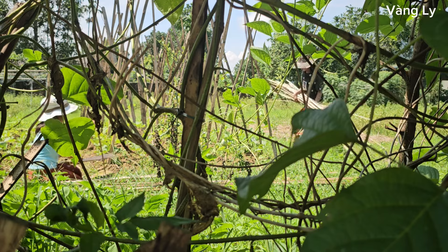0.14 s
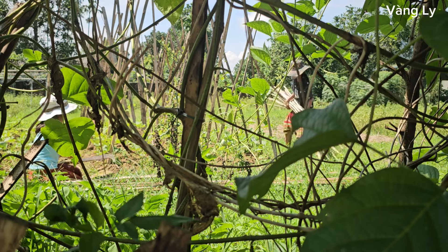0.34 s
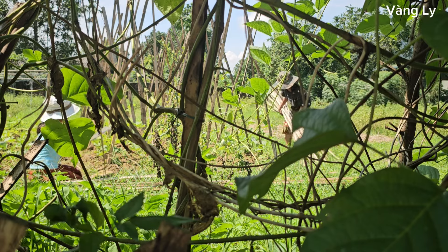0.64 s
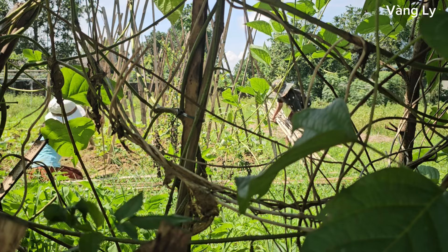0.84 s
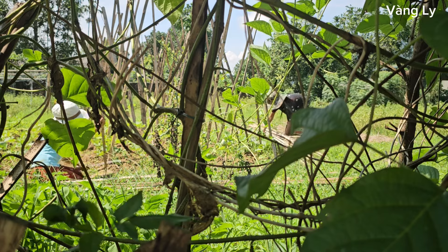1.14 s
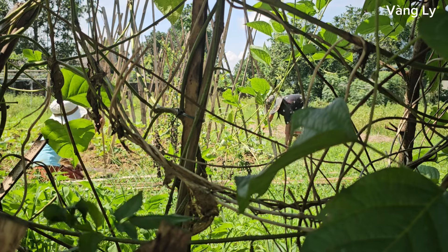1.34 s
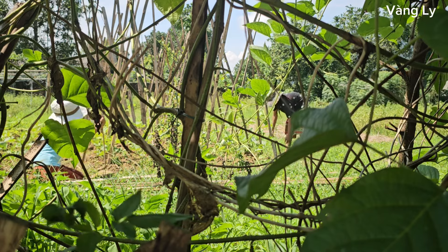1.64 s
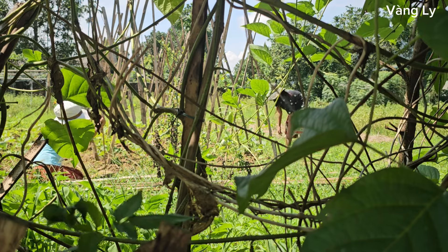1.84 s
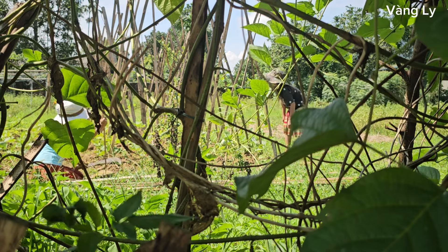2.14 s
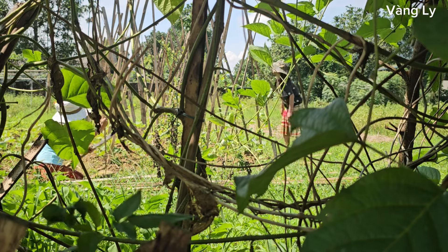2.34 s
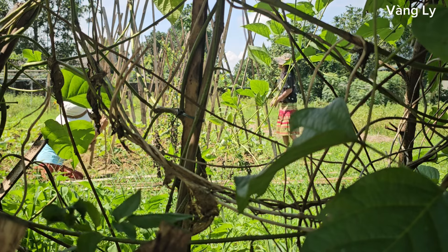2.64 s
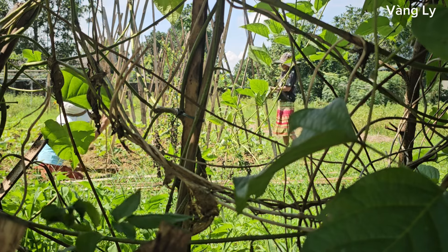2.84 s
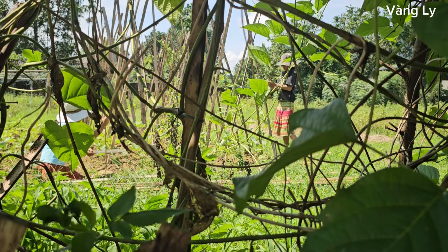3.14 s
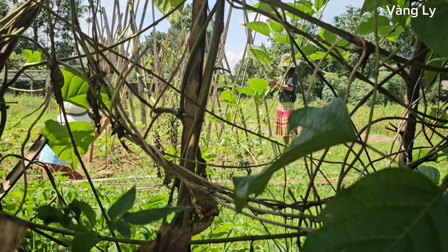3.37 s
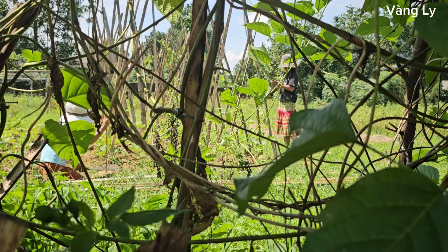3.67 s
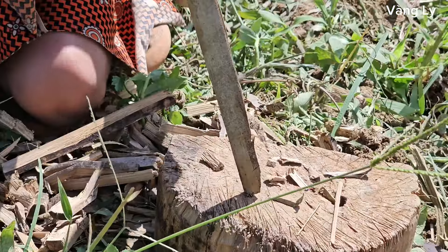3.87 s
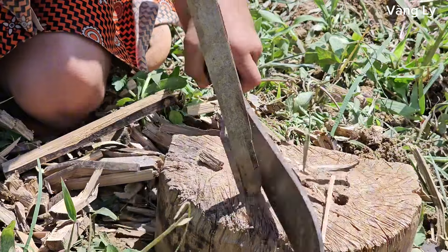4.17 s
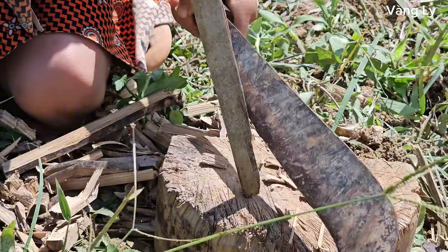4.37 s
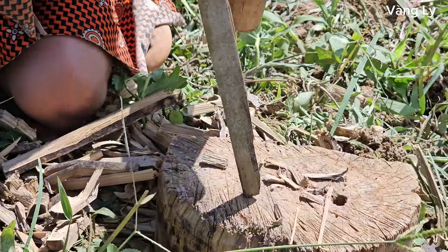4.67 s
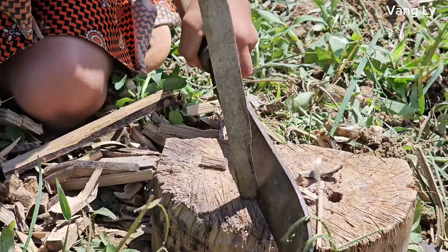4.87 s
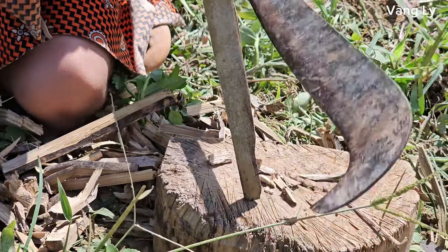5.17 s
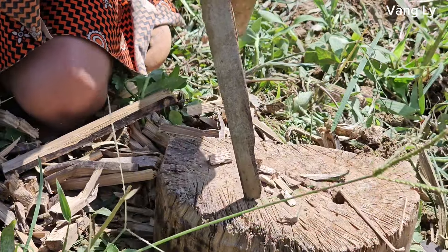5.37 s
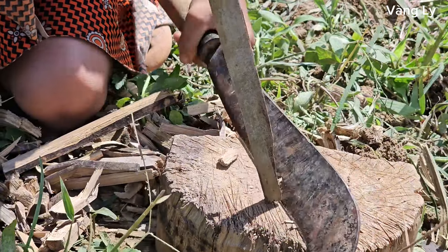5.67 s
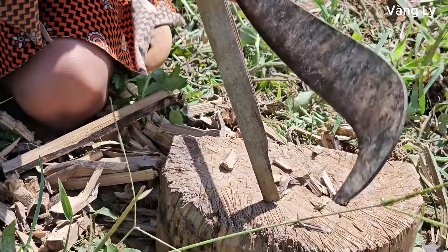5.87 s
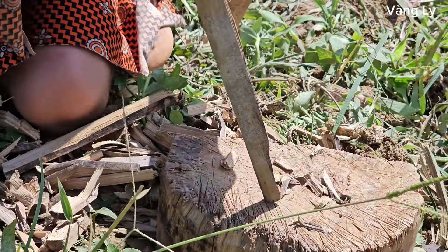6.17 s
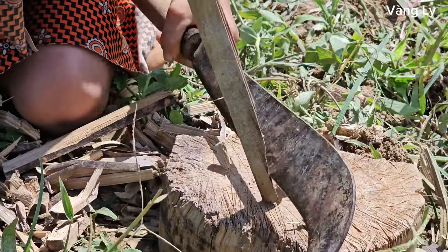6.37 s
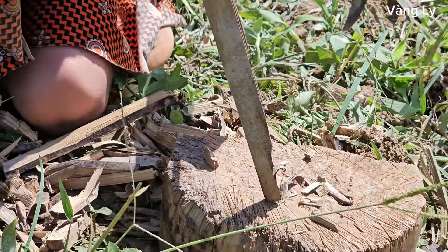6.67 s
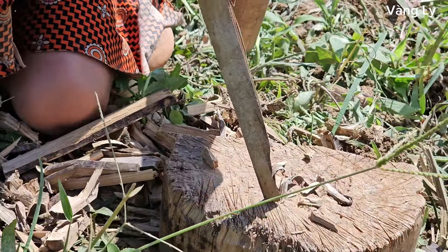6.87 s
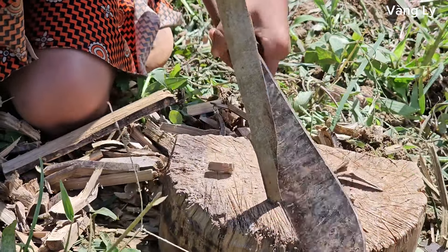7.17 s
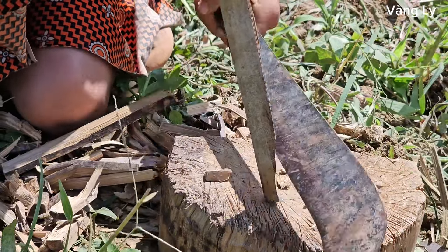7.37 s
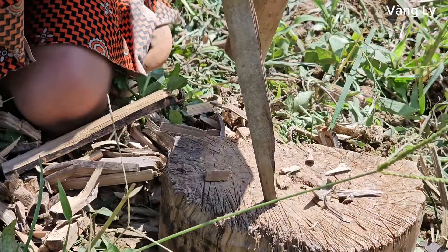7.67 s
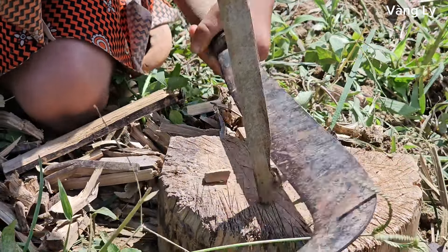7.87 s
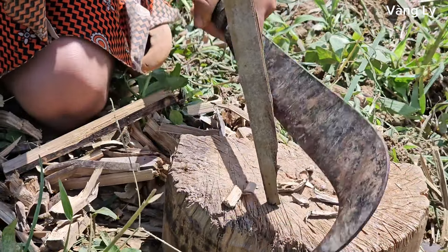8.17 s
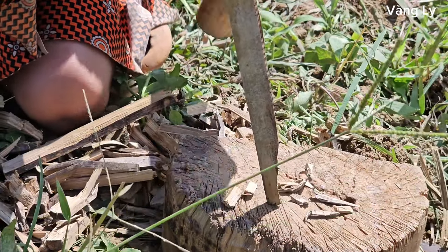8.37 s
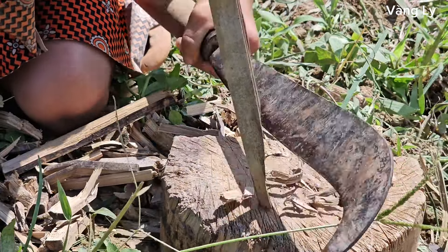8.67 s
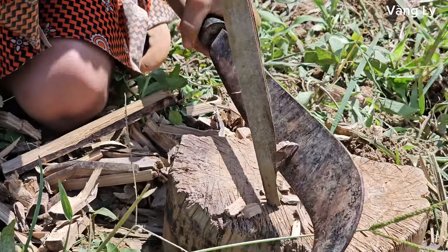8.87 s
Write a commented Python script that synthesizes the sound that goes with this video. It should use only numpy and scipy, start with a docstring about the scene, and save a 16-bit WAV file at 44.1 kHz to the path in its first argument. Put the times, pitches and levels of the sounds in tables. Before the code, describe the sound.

A sunny open garden with low breathing wind, a thin steady insect buzz around 4 to 8 kHz and light stereo width. From 0 to 3.7 seconds all is at a distance: a bird gives quick upward-leaping chirps, others whistle faintly, and leaves brush softly until about 2. Soft chops with outdoor echo fall at 1.1, 1.9, 2.7 and 3.5. At about 1.2 to 1.6 a bundle of bamboo poles lands, a dense hollow clatter with a short roll and a last clack. A very brief dip at 3.7 cuts to a close, drier perspective with slightly gusty rumble. Loud machete strokes crack a stake at 4.1, 4.9, 5.6, 6.3, 7.0, 7.8 and 8.6: sharp fibre snaps, short woody ringing, most followed by a double-hit knock on the stump, dull ground thumps, and splinters ticking down, fading between strokes.

```python
"""Stake sharpening in a garden

Moving air, an insect chorus and bird calls are shaped noise and gliding tones. A bundle of bamboo poles
lands and rolls: enveloped noise with struck modes. A machete sharpens a stake, first from afar, then close by:
bursts of snapping fibres excite resonances, the blade knocks on the stump, the stump thumps on the soil,
and chips patter down. Echo tails carry the surroundings; a brief dip in level parts the far and close views."""
import sys
import numpy as np
from scipy import signal
from scipy.fft import rfft, irfft, next_fast_len
from scipy.io import wavfile
from scipy.ndimage import uniform_filter1d

SR = 44100
rng = np.random.default_rng(int(sys.argv[2]) if len(sys.argv) > 2 else 0)


def to_wav(sig):
    """Store sig (one row per channel, or 1-D mono) as 16-bit WAV at the path in sys.argv[1].

    Samples outside -1..1 are clipped; the rate is SR.
    """
    pcm = np.clip(np.atleast_2d(sig), -1, 1) * 32767
    pcm = np.round(pcm).astype(np.int16)
    wavfile.write(sys.argv[1], SR, pcm.T)  # frames by channels


N = 397341
TIME = np.arange(N) / SR

# All levels are relative: mixing gains follow.
# dip between the far and the close view: start_s, end_s
GAP = (3.712, 3.745)
# spectrum of the air from afar, and close by: frequency_hz, density_db
AIR_FAR = [(20, -10.5), (50, 4), (110, -6), (200, -17.5), (400, -29), (900, -36.5), (2500, -39),
           (9000, -53), (16000, -40.5)]
AIR_CLOSE = [(20, -13), (48, 2.5), (110, -12), (220, -23), (380, -37.5), (650, -34.5), (1200, -44),
             (3000, -47), (9000, -54.5), (16000, -52)]
AIR_FAR_DB, AIR_CLOSE_DB = -52.5, -48
# swells of the breeze, close view: peak_s, half_width_s (to 1/e of the gain in dB), gain_db
GUSTS = [(3.904, 0.46, 3), (5.898, 1.2, 3), (8.617, 0.2, 4)]
# insect chorus: centre_hz, width_hz, far_level_db, close_level_db
INSECTS = [(4200, 300, -70, -71.5), (4800, 160, -71, -66), (5290, 200, -69, -66.5), (7570, 240, -71, -69.5)]
# likeness of left and right in diffuse sound: frequency_hz, correlation (0 to 1)
LIKENESS = [(60, 0.94), (130, .92), (290, 0.29), (640, 0.12), (1410, 0.2), (16000, 0.29)]
# reverberation of the garden: frequency_hz, t60_s
GARDEN_DECAY = [(100, 0.42), (600, 0.52), (2000, 0.41), (5000, 0.53), (15000, 0.1)]

# chirps of one bird: leap_s, level_db
CHIRPS = [(0.451, -46), (.598, -46), (0.856, -47), (1.827, -48), (2.106, -49), (2.31, -48), (2.498, -48.5),
          (3.441, -44.5), (3.679, -47)]
# faint glides of other birds: start_s, length_s, start_hz, end_hz, level_db
WHISTLES = [(0.146, 0.091, 6280, 4700, -54.5), (0.326, 0.13, 4760, 4730, -53.5),
            (0.385, 0.11, 7000, 7730, -54), (0.534, 0.031, 2740, 1950, -53),
            (3.089, 0.087, 4180, 4480, -57.5), (3.226, 0.14, 4610, 3470, -58.5)]
# a chirp is a low arch with a quick leap on top; each chirp varies its pitch and the leap a little
CHIRP_LEAD_S, CHIRP_TAIL_S = 0.033, 0.026  # before and after the leap
CHIRP_END_HZ, CHIRP_ARCH_HZ, CHIRP_LEAP_HZ = 1898, 2630, 4290
LEAP_RISE_S, LEAP_FALL_S, ARCH_DB, LEAP_DB = 0.0066, .01, -2, 4
CHIRP_QUAVER, WHISTLE_QUAVER = 0.043, 0.0197  # rms unsteadiness as a share of the pitch

# leaves brushing the poles: start_s, end_s, level_db
LEAVES = [(-.2, 2.03, -70.5), (.33, 0.69, -62), (.75, 1.7, -66)]
LEAF_RISE_S, LEAF_FALL_DB_PER_S = 0.055, 46
# spectrum of the leaves: frequency_hz, level_db
LEAF = [(300, 7.5), (1000, 3.5), (2200, 8.5), (5000, 5), (9000, -3), (12000, 2.5), (16000, -19)]
# the bundle meets the ground, tips first, then its full weight, then a bounce:
# start_s, level_db, rise_s, fall_db_per_s
LANDINGS = [(1.289, -41, 0.0043, 250), (1.312, -30.5, 0.027, 267), (1.374, -39.5, 0.0087, 121)]
LANDING_DULL_DB = -5.5  # hollow body of the poles against their bright clatter
ROLL_FROM_S, ROLL_TO_S, ROLL_DB, ROLL_RISE_S, ROLL_FALL_DB_PER_S = 1.16, 1.6, -55.5, .03, 157
# spectra of the bright clatter and the dull body: frequency_hz, level_db
POLES_BRIGHT = [(80, -1), (300, -6.5), (700, -25), (1400, 0), (3200, 1.5), (6000, -8.5), (10000, -36),
                (16000, -27)]
POLES_DULL = [(80, -1), (400, -9.5), (900, 7.5), (1600, 0), (4000, -1), (16000, -12.5)]
# single poles knocking clear of the clatter: start_s, pitch_hz, level_db
CLACKS = [(1.187, 690, -45), (1.585, 860, -41.5)]

# strokes: start_s, cut_length_s, tearing_db, tilt_db_per_octave, stake_ring_db, stump_thump_db
STROKES = [(1.075, 0.017, -33.5, -2.5, -52, -35.5), (1.924, 0.016, -34, -0.5, -53, -29.5),
           (2.684, 0.042, -37.5, -3.5, -56, -39), (3.511, 0.02, -37, -1, -64, -34),
           (4.1258, 0.02, -17.5, -1, -26.5, -25), (4.851, 0.011, -18.5, 1.5, -31.5, -22),
           (5.569, 0.0087, -14, -0.5, -22, -16.5), (6.2943, 0.008, -12.5, -1, -25.5, -11),
           (7.001, 0.01, -14.5, -0.1, -24.5, -22), (7.849, 0.0098, -12, -1, -24, -12.5),
           (8.6346, 0.0086, -13, -1, -17.5, -14)]
# blade on stump, with one rebound: start_s, strength_db, tilt_db_per_octave, rebound_delay_s, rebound_db
KNOCKS = [(2.7111, 16.5, -8, 0.0057, 1), (4.1502, 32, -2, 0.0044, 4), (4.866, 30.5, -1.5, 0.0038, 16),
          (5.6181, 15, -4.5, 0.016, 14.5), (7.0145, 29.5, -2, 0.0039, 18), (7.935, 1.5, -18, 0.00524, -14),
          (7.9514, 10.5, -1.5, 0.0053, 10), (8.7224, 1, 4.5, 0.0068, -2.5)]
# larger splinters snapping off or landing: start_s, level_db, tilt_db_per_octave
CHIPS = [(3.523, -32.5, 3.5), (3.753, -31, -1), (3.773, -40.5, -1), (4.025, -48.5, -2),
         (4.199, -35.5, -4.5), (4.276, -42.5, -3.5), (4.301, -40, 2), (4.372, -41, 1), (4.45, -47, -4),
         (5.6257, -22, -10), (5.642, -33.5, -5), (5.8, -42.5, -4.5), (5.883, -48, -2), (6.333, -29.5, -7.5),
         (6.369, -29.5, -2.5), (6.38, -38, -4), (6.439, -41, 2), (6.534, -44.5, -2), (6.745, -50, -6.5),
         (7.072, -34, 0), (7.131, -41, -3.5), (7.283, -39, -2), (7.9228, -23, 0.5), (7.934, -29, -2.5),
         (8.067, -33.5, 1), (8.1312, -41, 1.5), (8.179, -49.5, -1), (8.678, -26.5, -5),
         (8.7177, -19.5, -2.5), (8.79, -25, 3), (8.908, -35.5, -2.5)]
# spectra of torn fibres, of a chip, and of a knock on the stump: frequency_hz, level_db
TEAR = [(100, -3), (400, -9.5), (900, -2), (2000, -2), (4500, 1.5), (8000, 1), (12000, 0.5), (16000, -6.5)]
CHIP = [(200, -22), (1000, -23), (2500, -10), (3700, 1), (7000, 4.5), (11000, 4), (16000, -5)]
STUMP = [(50, -23), (150, -14), (250, -10.5), (350, -22), (410, -14), (500, -2.5), (620, -5.5), (770, 2),
         (950, -6.5), (1400, -8.5), (1750, -23), (2030, -3.5), (2500, -23.5), (4000, -20.5), (12000, -34)]
# spectrum of a knock as the surroundings return it: frequency_hz, level_db
ECHO_COLOUR = [(100, 3), (350, 8.5), (560, -2), (770, -5), (1100, -5.5), (1500, 0), (2030, -1), (3000, 3),
               (8000, 1.5)]
# modes of the stake: pitch_hz, level_db
STAKE = [(1130, -7.5), (1210, -7), (1310, 0), (1710, -4.5), (1850, 2), (2350, -11.5), (2880, -6), (3100, 3),
         (3570, -1), (3930, 1.5), (4200, 2), (4800, -3), (5380, -6.5)]
STAKE_T60_S = .03  # shared by all its modes
# modes of blade and stump after a knock: pitch_hz, level_db, t60_s
BLADE = [(555, -67, .13), (1280, -75, .14), (2020, -69, .14), (2340, -79, .1), (3730, -77, .12)]
# range of the modes of a chip: lowest_hz, highest_hz
CHIP_RANGE = (3200, 7500)
CHIP_S = .0055  # length of its crackle
# small chips after each stroke: first and last landing, level against the tearing, fall with delay
SHOWER_FROM_S, SHOWER_TO_S, SHOWER_DB, SHOWER_FALL_DB_PER_S = 0.036, .3, -22, 64.5


def amp(db):
    """Level law: decibels to amplitude gain."""
    return 10 ** (np.asarray(db) / 20)


def unit(x):
    """Normalisation: scales a signal to rms 1."""
    return x / np.sqrt(np.mean(x ** 2) + 1e-20)


def read(points, hz):
    """Interpolation: joins a table's points along a log-frequency axis."""
    f, value = np.transpose(points)
    return np.interp(np.log(hz + 1), np.log(f + 1), value)


def add(mix, s, sound):
    """Superposition: adds a sound to the mix at time s."""
    part = mix[round(s * SR):][:len(sound)]
    part += sound[:len(part)]


def swell(start, end, rise_s, fall_db_per_s):
    """Envelope: linear rise from the start, hold until the end, exponential decay."""
    rise = np.clip((TIME - start) / rise_s, 0, 1)
    return rise * amp(-fall_db_per_s * np.clip(TIME - end, 0, 2))


def wander(below_hz):
    """Low-pass noise: a slow random fluctuation of rms 1."""
    size = next_fast_len(N)
    spectrum = rfft(rng.standard_normal(size))
    return unit(irfft(spectrum * (np.fft.rfftfreq(size, 1 / SR) < below_hz), size)[:N])


def correlate(a, b, likeness):
    """Interaural coherence: a stereo pair from independent spectra a and b."""
    return np.array([a, likeness * a + np.sqrt(1 - likeness ** 2) * b])


def diffuse(colour, grain_db=0):
    """Diffuse field: stereo noise, most alike in the bass; grain makes its level uneven."""
    size = next_fast_len(N)
    hz = np.fft.rfftfreq(size, 1 / SR)
    clumps = amp(grain_db * np.repeat(rng.standard_normal(size), 48)[:size])
    a, b = rfft(rng.standard_normal((2, size)) * clumps)
    stereo = correlate(a, b, read(LIKENESS, hz))
    return unit(irfft(stereo * amp(read(colour, hz)), size)[:, :N])


def click(colour, tilt_db=0, pivot_hz=700, size=4096):
    """Minimum phase: the most compact causal impulse with a given spectrum."""
    hz = np.fft.rfftfreq(size, 1 / SR)
    level_db = read(colour, hz) + tilt_db * np.log2(np.maximum(hz / pivot_hz, .5))
    log_gain = np.log(amp(level_db))
    both_sides = np.r_[log_gain, log_gain[-2:0:-1]]
    # the phase is the Hilbert transform of the log gain
    return np.fft.ifft(np.exp(np.conj(signal.hilbert(both_sides)))).real


def ring(modes, detune=0):
    """Modal synthesis: a sum of decaying sines, each randomly detuned by up to a given share."""
    longest_s = max(t60 for _, _, t60 in modes)
    t = np.arange(round(1.2 * SR * longest_s) + 64) / SR
    sound = 0
    for hz, db, t60 in modes:
        shifted_hz = hz * (1 + detune * rng.uniform(-1, 1))
        sound = sound + amp(db - 60 * t / t60) * np.sin(2 * np.pi * shifted_hz * t)
    return sound


def crackle(length, grain_db=3.5, fade_s=.0025):
    """Fracture noise: fibres snap unevenly through the cut, then the force decays exponentially."""
    t = np.arange(SR // 12) / SR
    grain = np.repeat(rng.standard_normal(len(t)).clip(-2, 2), 12)[:len(t)]
    snaps = rng.standard_normal(len(t)) * amp(grain_db * grain)
    force = np.interp(t, [0, length / 2, length], [1, 1, .5])
    return snaps * force * np.exp(-np.maximum(t - length, 0) / fade_s)


def burst(drive, body, length):
    """Forced resonance: a drive excites a body; the energy is that of rms 1 over the length."""
    sound = signal.fftconvolve(drive, body)
    return sound * np.sqrt(length * SR / np.sum(sound ** 2))


def scatter(x, t60s, rise_s):
    """Scattering: ground, stems and trees return a clustered tail, its decay set for each frequency."""
    size = SR * 3 // 4
    clusters = amp(2.5 * unit(uniform_filter1d(rng.standard_normal(size), size=200)))
    hz, t, z = signal.stft(rng.standard_normal((2, size)) * clusters, SR, nperseg=256)
    z = correlate(z[0], z[1], read(LIKENESS, hz)[:, None])
    decay = np.exp(-np.log(1000) * t / read(t60s, hz)[:, None])
    tail = signal.istft(z * decay, SR, nperseg=256)[1]
    tail = tail * (1 - np.exp(-np.arange(tail.shape[1]) / SR / rise_s))
    return signal.fftconvolve(x[None], tail / np.linalg.norm(tail[0]), axes=1)[:, :N]


def from_left(x, lead_s, balance_db):
    """Interaural time and level difference: the left channel leads by lead_s."""
    lag = round(lead_s * SR)
    delayed = np.r_[np.zeros(lag), x][:N]
    return np.array([x * amp(balance_db / 2), delayed * amp(-balance_db / 2)])


def air():
    """Wind noise: a low rumble, its level fluctuating, with gusts in the close view."""
    gust_db = sum(db * np.exp(-((TIME - s) / half_s) ** 2) for s, half_s, db in GUSTS)
    far = amp(AIR_FAR_DB) * diffuse(AIR_FAR)
    close = amp(AIR_CLOSE_DB + gust_db) * diffuse(AIR_CLOSE)
    rumble = np.where(TIME < GAP[0], far, close) * amp(1.2 * wander(20))
    return signal.sosfilt(signal.butter(2, 30, "high", fs=SR, output="sos"), rumble)


def buzz(centre_hz, width_hz):
    """Incoherent sum: many insects blur into one noise band around their shared resonance."""
    size = next_fast_len(N)
    band = np.exp(-((np.fft.rfftfreq(size, 1 / SR) - centre_hz) / (2 * width_hz)) ** 2)
    return unit(irfft(rfft(rng.standard_normal((2, size))) * band, size)[:, :N])


def insects(pulses_per_s=8.7, pulse_at_s=2.41):
    """Amplitude modulation: a nearly steady chorus, and from afar one insect that pulses."""
    far = TIME < GAP[0]
    chorus = 0
    for hz, width_hz, far_db, close_db in INSECTS:
        chorus = chorus + buzz(hz, width_hz) * amp(np.where(far, far_db, close_db))
    pulses = (1 + .5 * np.cos(2 * np.pi * pulses_per_s * (TIME - pulse_at_s))) / 2 * far
    pulsing_db = np.interp(TIME, [1.5, 3], [-68, -64])
    return chorus * amp(.5 * wander(20)) + buzz(6080, 120) * pulses * amp(pulsing_db)


def quaver(hz, share):
    """Frequency jitter: a bird's pitch never holds quite still."""
    return hz * (1 + share * unit(uniform_filter1d(rng.standard_normal(len(hz)), size=60)))


def chirp(throat_hz=4000, throat_width_hz=1400):
    """Source and filter: a gliding tone and its octave through a broad throat resonance."""
    t = np.arange(-CHIRP_LEAD_S, CHIRP_TAIL_S, 1 / SR)
    stretch, pitch, height = 1 + rng.uniform(-1, 1, 3) * [.3, .05, .15]  # no two quite alike
    arch = np.sqrt(abs(np.sin(np.linspace(0, np.pi, len(t)))))
    leap = np.exp(-(t / stretch / np.where(t < 0, LEAP_RISE_S, LEAP_FALL_S)) ** 2)
    arch_hz = CHIRP_END_HZ + (CHIRP_ARCH_HZ - CHIRP_END_HZ) * arch
    leap_hz = (CHIRP_LEAP_HZ - CHIRP_ARCH_HZ) * leap * height
    hz = quaver(pitch * (arch_hz + leap_hz), CHIRP_QUAVER)
    phase = 2 * np.pi * np.cumsum(hz) / SR
    tone = 0
    for k in (1, 2):
        tone = tone + np.sin(k * phase) / (1 + ((k * hz - throat_hz) / throat_width_hz) ** 4)
    return arch * amp(ARCH_DB + LEAP_DB * leap) * tone


def whistle(length, start_hz, end_hz):
    """Frequency modulation: a single tone glides by equal ratios."""
    u = np.linspace(0, 1, round(length * SR))
    hz = quaver(start_hz * (end_hz / start_hz) ** u, WHISTLE_QUAVER)
    return np.sqrt(abs(np.sin(np.pi * u))) * np.sin(2 * np.pi * np.cumsum(hz) / SR)


def birds():
    """Reverberation: one bird chirps, others whistle, and the trees smear each call."""
    calls = np.zeros(N)
    for s, db in CHIRPS:
        add(calls, s - CHIRP_LEAD_S, amp(db) * chirp())
    for s, length, start_hz, end_hz, db in WHISTLES:
        add(calls, s, amp(db) * whistle(length, start_hz, end_hz))
    smeared = scatter(calls, [(2000, 0.27), (8000, 0.27)], rise_s=0.0065)
    return amp(-5.0) * calls + amp(-2.5) * smeared


def bundle_motion():
    """Energy addition: envelopes of the poles clashing as they land, and of their rolling."""
    power = sum((amp(db) * swell(s, s + rise_s, rise_s, fall)) ** 2 for s, db, rise_s, fall in LANDINGS)
    roll = amp(ROLL_DB) * swell(ROLL_FROM_S, ROLL_TO_S, ROLL_RISE_S, ROLL_FALL_DB_PER_S)
    return np.sqrt(power), roll


def leaves():
    """Friction noise: leaves brush the carried poles in overlapping swells."""
    power = 0
    for start, end, db in LEAVES:
        power = power + (amp(db) * swell(start, end, LEAF_RISE_S, LEAF_FALL_DB_PER_S)) ** 2
    return np.sqrt(power) * diffuse(LEAF, grain_db=2.5)


def bundle():
    """Many impacts merge into noise: bright and dull as the poles clash, dull as they roll to rest."""
    clash, roll = bundle_motion()
    dull = np.hypot(roll, amp(LANDING_DULL_DB) * clash)
    clatter = clash * diffuse(POLES_BRIGHT) + dull * diffuse(POLES_DULL, grain_db=1.0)
    return clatter * amp(1.7 * wander(80))


def pole_clacks(count=30, t60=0.016):
    """Bending modes: single hollow poles clack within the clatter, each at its own pitch."""
    out, force = np.zeros(N), np.hypot(*bundle_motion())
    clacks = [(s, hz, amp(db)) for s, hz, db in CLACKS]
    for when, pitch, luck in rng.random((count, 3)):
        s = ROLL_FROM_S + (ROLL_TO_S - ROLL_FROM_S) * when
        clacks.append((s, 520 + 700 * pitch, force[round(s * SR)] * amp(5 * luck)))
    for s, hz, gain in clacks:
        # overtones near those of a free bar
        add(out, s, gain * ring([(hz, 0, t60), (hz * 2.76, -2, t60 / 2), (hz * 5.4, -5, t60 / 2)]))
    return from_left(out, lead_s=.00018, balance_db=2) + amp(-4) * scatter(out, GARDEN_DECAY, rise_s=.005)


def debris(count=14, fall_db_per_s=95, level_db=-21, t60=0.013):
    """Small resonators: fragments rattle in the dry litter after each stroke, softer with delay."""
    out = np.zeros(N)
    for s, _, tear_db, *_ in STROKES:
        for when, pitch, force in rng.random((count, 3)):
            delay = .03 + .16 * when
            hz = 1200 * 3.5 ** pitch
            tick = ring([(hz, 0, t60), (hz * 1.9, -1, t60 / 2), (hz * 4.5, -2, t60 / 2)])
            add(out, s + delay, amp(tear_db + level_db - fall_db_per_s * delay + 3 * force) * tick)
    return out


def chip(db, tilt_db, ring_db=-6):
    """Fracture and resonance: a splinter crackles and rings with six pitches of its own."""
    snaps = crackle(CHIP_S, grain_db=4.5, fade_s=.0008)
    modes = [(hz, tilt_db * np.log2(hz), .022) for hz in rng.uniform(*CHIP_RANGE, size=6)]
    sound = np.zeros(SR // 8)
    add(sound, 0, burst(snaps, click(CHIP, tilt_db, size=1024), CHIP_S))
    add(sound, 0, amp(ring_db) * burst(snaps, ring(modes), CHIP_S))
    return amp(db) * sound


def chips(count=5, shower_tilt_db=-2, spread_db=3):
    """Random impacts: large splinters, then small chips after each stroke, softer with delay."""
    out = np.zeros(N)
    for s, db, tilt_db in CHIPS:
        add(out, s, chip(db, tilt_db))
    for s, _, tear_db, *_ in STROKES:
        for k, (when, force, colour) in enumerate(rng.random((count, 3))):
            delay = SHOWER_FROM_S * (SHOWER_TO_S / SHOWER_FROM_S) ** ((k + when) / count)
            db = tear_db + SHOWER_DB - SHOWER_FALL_DB_PER_S * delay + spread_db * (2 * force - 1)
            add(out, s + delay, chip(db, shower_tilt_db + 2 * (2 * colour - 1)))
    return out


def cuts(release_db=-2):
    """Forced and free vibration: tearing fibres ring the stake, which springs back mid-cut."""
    out = np.zeros(N)
    thin_stake = signal.butter(4, 900, "high", fs=SR, output="sos")  # radiates little bass
    for s, length, tear_db, tilt_db, stake_db, _ in STROKES:
        fibres = crackle(length, grain_db=4.2, fade_s=.0014)
        stake = ring([(hz, db, STAKE_T60_S) for hz, db in STAKE], detune=0.013)
        stake = signal.sosfilt(thin_stake, stake)
        add(out, s, amp(tear_db) * burst(fibres, click(TEAR, tilt_db, pivot_hz=2000), length))
        flex = fibres / np.linalg.norm(fibres)
        flex[round(length * SR / 2)] += amp(release_db)  # the shaving parts
        add(out, s, amp(stake_db) * burst(flex, stake, length))
    return out


def give(x, hz, radius):
    """All-pass dispersion: yielding wood delays the band around hz, so a knock builds up."""
    denominator = [1, -2 * radius * np.cos(2 * np.pi * hz / SR), radius * radius]
    return signal.lfilter(denominator[::-1], denominator, x)


def blade_knocks():
    """Impact and rebound: the blade strikes the stump twice, and both ring."""
    out = np.zeros(N)
    for s, first_db, tilt_db, rebound_s, rebound_db in KNOCKS:
        for at, db in (s, first_db), (s + rebound_s, rebound_db):
            add(out, at, -amp(db) * give(click(STUMP, tilt_db), hz=1000, radius=.86))
            add(out, at, amp(db - 0.5) * ring(BLADE, detune=0.021))
    return out


def stump_thumps():
    """Mass on a spring: the stump rocks on soft soil as each cut ends."""
    out = np.zeros(N)
    for s, length, _, _, _, db in STROKES:
        add(out, s + .75 * length, ring([(74, db, .16), (135, db - 3, .035), (215, db - 4, .035)]))
    # earth passes only the bass
    return signal.sosfilt(signal.butter(3, [35, 300], "band", fs=SR, output="sos"), out)


def litter_echoes(x, count=3):
    """Early reflections: stump top and litter mirror each crack within milliseconds."""
    t = np.arange(SR // 60) / SR
    envelope = (1 - np.exp(-t / .0008)) * np.exp(-t / .0018)
    taps = rng.standard_normal((count, 2, len(t))) * envelope
    taps /= np.linalg.norm(taps, axis=2, keepdims=True)
    # one of three random echo patterns, changed just before each stroke for variety
    pattern = np.searchsorted([stroke[0] - .1 for stroke in STROKES], TIME) % count
    out = 0
    for k in range(count):
        out = out + signal.oaconvolve((x * (pattern == k))[None], taps[k], axes=1)[:, :N]
    return out


def chopping():
    """Direct-to-reverberant ratio: the work is wetter from afar, drier from close by."""
    knocks = blade_knocks()
    cracks = cuts() + chips() + debris()
    afar = TIME < GAP[0]
    direct = from_left(cracks * afar, lead_s=.00018, balance_db=3)
    direct = direct + from_left(cracks * ~afar, lead_s=.00007, balance_db=1.5)
    thock = from_left(knocks, lead_s=.00003, balance_db=0)
    litter = litter_echoes(cracks)
    spread = cracks + signal.oaconvolve(knocks, click(ECHO_COLOUR))[:N]
    far, near = spread * afar, spread * ~afar
    stem_decay = [(200, 0.0625), (2000, 0.089), (12000, 0.053)]  # frequency_hz, t60_s
    stems = scatter(amp(-8.5) * far + amp(-11.0) * near, stem_decay, rise_s=0.0049)
    trees = scatter(amp(-10) * far + amp(-22.5) * near, GARDEN_DECAY, rise_s=0.0077)
    # echoes slightly louder on the left than on the right
    echoes = (amp(-1.0) * litter + stems + trees) * amp([[.9], [-.9]])
    return amp(-6.5) * direct + thock + stump_thumps() + echoes


def scene():
    """Superposition of all sources, with a smoothed 40 dB dip between the two views."""
    heard = uniform_filter1d(1. * ((TIME < GAP[0]) | (TIME > GAP[1])), size=100)
    mix = air() + insects() + birds() + leaves() + bundle() + pole_clacks() + chopping()
    return mix * np.maximum(heard, amp(-40))


def record(dry):
    """Clipping and band limiting: full scale is 1, and a linear-phase low-pass cuts at 16050 Hz."""
    low_pass = signal.firwin(301, 16050, window=("kaiser", 8), fs=SR)
    return signal.oaconvolve(np.clip(dry, -1, 1), low_pass[None], "same")


dry = scene()
out = record(dry)
to_wav(out)
```